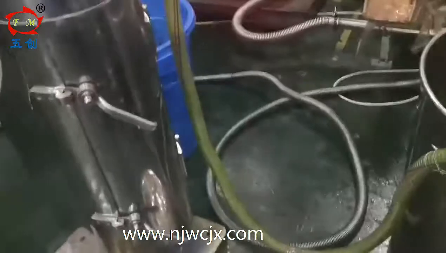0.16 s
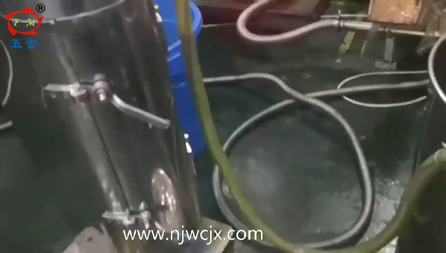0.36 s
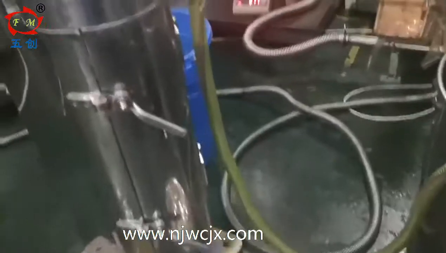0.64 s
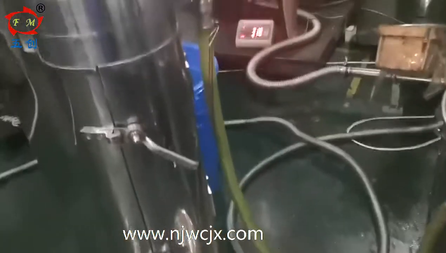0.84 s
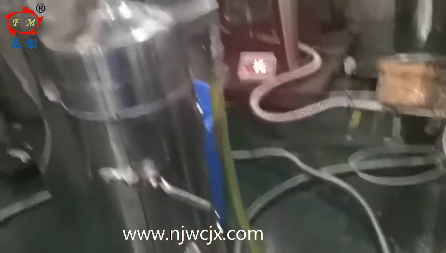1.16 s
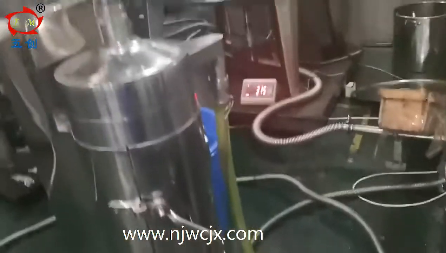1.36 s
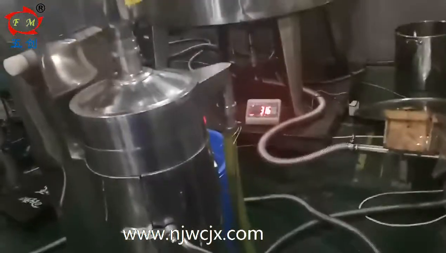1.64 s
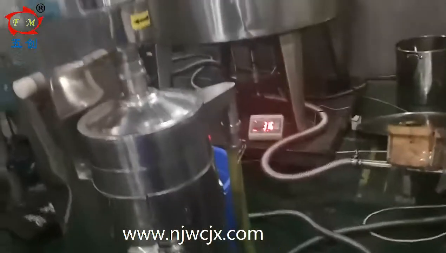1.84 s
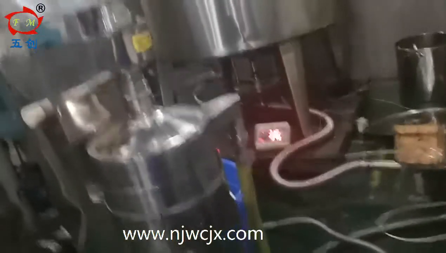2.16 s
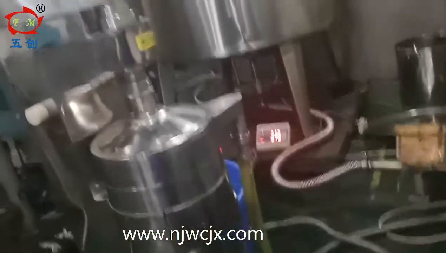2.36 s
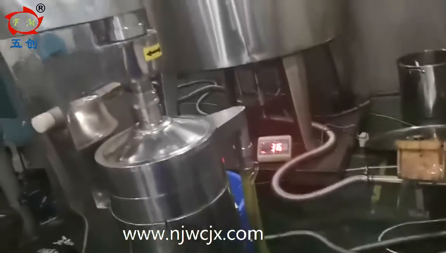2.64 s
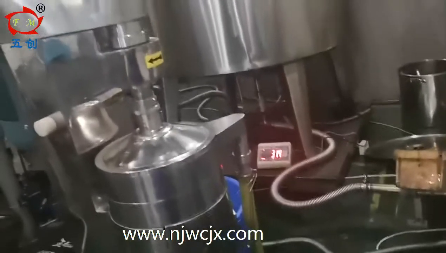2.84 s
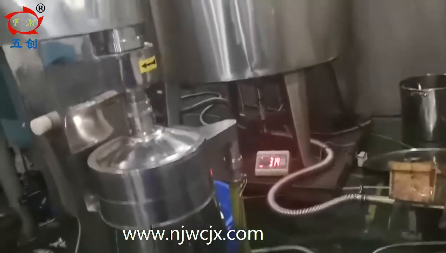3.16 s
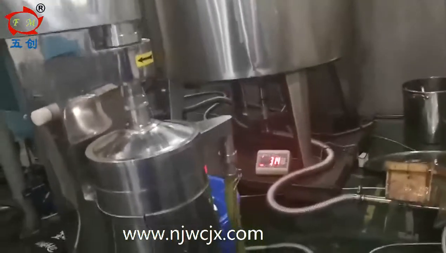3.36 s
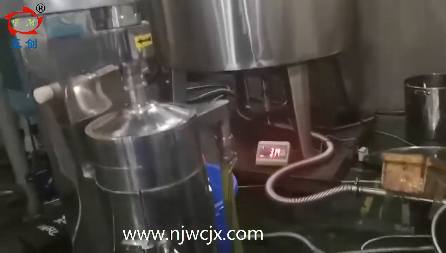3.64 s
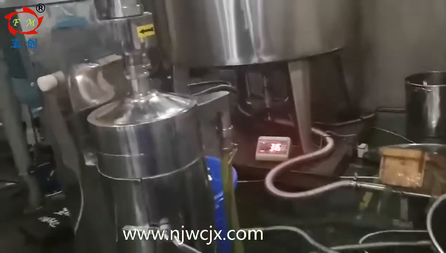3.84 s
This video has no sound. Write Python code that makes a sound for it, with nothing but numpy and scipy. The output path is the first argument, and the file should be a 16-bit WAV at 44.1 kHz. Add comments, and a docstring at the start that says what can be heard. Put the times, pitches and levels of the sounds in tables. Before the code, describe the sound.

Loud steady centrifuge roar with throbbing low hum and metallic bearing rattle, cutting in abruptly.

```python
"""A tubular centrifuge runs at full speed in a workshop, heard from close by; the sound cuts in abruptly.
Spindle and belt hum as steady sines, and the motor's hum beats against the belt as a throb.
The bearings roar and rattle as noise and knocks through a ringing steel housing, and whine with the frame
as wavering sines. Low filtered noise rumbles underneath, and two faint whistles surface late."""
import sys
import numpy as np
from scipy import signal
from scipy.fft import rfft, irfft
from scipy.io import wavfile

SR = 44100
rng = np.random.default_rng(int(sys.argv[2]) if len(sys.argv) > 2 else 0)


def wav_record(signal):
    """Record a signal, one row per channel, as 16-bit PCM in the file named by sys.argv[1]."""
    frames = np.transpose(np.atleast_2d(signal))
    bounded = np.clip(frames, -1, 1)
    # unit amplitude maps onto the largest positive 16-bit level
    quanta = np.round(bounded * 32767).astype(np.int16)
    wavfile.write(sys.argv[1], SR, quanta)


N = 176400  # 4 s

SPINDLE_HZ, BELT_HZ, MOTOR_HUM_HZ = 264.97, 71.0, 149.1
IN_STEP_S = 2.55  # a moment at which all tones are in step, apart from their drift


def amp(db):
    """Decibels to gain."""
    return 10 ** (np.asarray(db) / 20)


def unit(x):
    """Scales to an rms of 1."""
    return x / np.sqrt(np.mean(x ** 2) + 1e-20)


def seconds():
    """The time of each sample."""
    return np.arange(N) / SR


def bins():
    """The frequency of each bin of a full-length spectrum."""
    return np.fft.rfftfreq(N, 1 / SR)


def wander(rate_hz):
    """Smooth random movement of rms 1, mostly below the given rate."""
    lowpass = 1 / (1 + (bins() / rate_hz) ** 4)
    return unit(irfft(rfft(rng.standard_normal(N)) * lowpass, N))


def colour(x, points):
    """Minimum-phase filter with the given (f/Hz, level/dB) shape; the result has rms 1."""
    hz, db = np.transpose(points)
    all_hz = abs(np.fft.fftfreq(N, 1 / SR))
    shape_db = np.interp(np.log(all_hz + 1), np.log(hz), db)
    # the Hilbert transform of the log gain gives the phase
    response = np.exp(np.conj(signal.hilbert(np.log(amp(shape_db)))))
    return unit(irfft(rfft(x) * response[:N // 2 + 1], N))


def tone(hz, db, waver, drift, rate_hz):
    """A sine that wavers in level (share of level) and drifts in phase (radians)."""
    angle = 2 * np.pi * hz * (seconds() - IN_STEP_S) + drift * wander(rate_hz)
    level = np.sqrt(2) * amp(db) * (1 + waver * wander(rate_hz))
    return level * np.cos(angle)


def drive():
    """Spindle and belt tones with their multiples, and the sum tones where they shake each other."""
    # tones of the drive: [multiple of the spindle rate, multiple of the belt rate]
    orders = [(0, 1), (0, 3), (1, 0), (1, 1), (0, 6), (1, 3), (1, 5), (2, 3), (3, 0), (2, 5), (2, 7),
              (2, 10), (5, 0), (6, 0), (0, 24)]
    # their levels in the same order, ahead of the band curves: [level/dB]
    levels = [-41.5, -46.5, -36, -37.5, -47.5, -50, -53.5, -49, -37.5, -47.5, -62, -46, -45.5, -48, -42]
    hum = 0
    for (spindle, belt), db in zip(orders, levels):
        hz = spindle * SPINDLE_HZ + belt * BELT_HZ
        hum = hum + tone(hz, db, waver=0.085, drift=0.29, rate_hz=3.6)
    return hum


def throb():
    """The motor's hum beats seven times a second against the belt's second harmonic."""
    # level curve of the throb: [t/s, level/dB]
    throb_level = [(.36, 2.5), (.72, 2.5), (.9, -0.8), (1.9, 1.2), (2.6, 1.5), (4, -0.3)]
    settings = dict(waver=0.068, drift=0.11, rate_hz=2.7)
    belt = tone(2 * BELT_HZ, -33, **settings)
    motor = tone(MOTOR_HUM_HZ, -34.5, **settings)
    return amp(np.interp(seconds(), *np.transpose(throb_level))) * (belt + motor)


def housing(x):
    """Dense steel modes, made as decaying noise, ring on after the direct sound."""
    # sound of the bearings through the housing: [f/Hz, level per Hz/dB]
    roar = [(300, -30), (600, -19.5), (740, -12.5), (900, -6.5), (1150, -5.5), (1330, -2.5), (1500, -6),
            (1690, -0.5), (1950, -1), (2150, -5.5), (2300, -7), (2600, -7), (2900, -10), (3130, -13),
            (3550, -11.5), (3800, -15), (4250, -20), (4650, -18), (5250, -15), (5650, -13.5), (6050, -20.5),
            (7000, -21), (7850, -25), (8250, -35.5), (8650, -35), (9050, -31.5), (10000, -38.5),
            (11200, -42.5), (12700, -54.5), (15000, -64)]
    t60_s, ring_share = 0.26, 0.068  # decay by 60 dB, share of the power
    ring = rng.standard_normal(N) * amp(-60 * seconds() / t60_s)
    rung = irfft(rfft(x) * rfft(ring / np.linalg.norm(ring)), N)
    return colour(np.sqrt(1 - ring_share) * x + np.sqrt(ring_share) * rung, roar)


def bearings():
    """Rough rolling noise and a rattle of small knocks drive the housing."""
    roll_db, rattle_db = -22.5, -27
    knocks_per_s, knock_spread_db = 1000, 2.8
    rolling = unit(rng.standard_normal(N) * amp(-1 * wander(rate_hz=300)))  # 1 dB rms of roughness
    size_db = knock_spread_db * np.minimum(rng.exponential(1, N), 3)
    sizes = amp(size_db) * rng.choice([-1, 1], N)
    knocks = unit(sizes * (rng.random(N) < knocks_per_s / SR))
    force = amp(roll_db) * rolling + amp(rattle_db) * knocks
    swell = amp(0.33 * wander(rate_hz=9.3))  # 0.33 dB rms
    return np.std(force) * housing(force) * swell


def whines():
    """Less steady tones of bearings and frame; the higher, the more they drift."""
    # tones of bearings and frame, ahead of the band curves: [f/Hz, level/dB]
    whine_tones = [(58.2, -49), (83.2, -49.5), (116.4, -47), (120.7, -45.5), (216.5, -43), (234, -53),
                   (433.3, -52.5), (510, -58), (550, -53.5), (1080, -44.5), (1714, -45), (1803, -46),
                   (1937, -49), (1986, -53), (2118, -58), (2209, -38.5), (2550, -44.5), (2633, -50),
                   (2950, -51), (3546, -50), (4918, -56), (5598, -53), (5685, -55), (7010, -63),
                   (8910, -72)]
    waver, drift_at_1khz = 0.47, 0.83  # share of level, radians
    return sum(tone(hz, db, waver, drift_at_1khz * hz / 1000, rate_hz=5.1) for hz, db in whine_tones)


def rumble():
    """The frame shakes at random: noise shaped towards the bass."""
    # low rumble of the frame: [f/Hz, level per Hz/dB]
    frame_shape = [(12, -15), (30, -6), (48, -4.5), (65, 2.5), (92, 1), (130, 4), (190, 1.5), (240, 3),
                   (330, 2.5), (385, -2.5), (520, -5.5), (720, -7.5), (1200, -39), (4000, -68.5)]
    return amp(-31) * colour(rng.standard_normal(N), frame_shape)


def whistles():
    """Two thin tones fade in late above the roar; the first fades out again."""
    # faint whistles: [f/Hz, start t/s, end t/s, level/dB ahead of the band curves]
    whistle_tones = [(884, 3.1, 3.68, -39.5), (1078, 3.3, 4.1, -37)]
    t, fade_s = seconds(), .1
    total = 0
    for hz, start, end, db in whistle_tones:
        fade = np.clip(np.minimum(t - start, end - t) / fade_s, 0, 1)
        total = total + fade * tone(hz, db, waver=.2, drift=.5, rate_hz=4)
    return total


def scene():
    """The machine with bass, middle and treble on their own level curves, plus the throb."""
    # loudness at the microphone: [t/s, bass level/dB, middle level/dB, treble level/dB]
    band_levels = [(.36, 4.5, 3, 3), (.41, 5, 4, 4), (.52, 5, 2, 2), (.62, 5, 3, 3.5), (.73, 5, 3, 0),
                   (.83, -0.5, -0.5, -1), (1.05, -0.7, -0.5, -0.1), (1.3, .3, -0.2, -1),
                   (1.8, 0.6, 0.2, -0.5), (2.3, 0.5, -.2, -0.4), (2.7, 1.5, 0.4, 0), (3.1, 1.1, -0.1, 1),
                   (3.45, -0.5, .1, -1), (4, 0.7, 0.2, -0.2)]
    spectrum = rfft(bearings() + rumble() + drive() + whines() + whistles())
    bass = 1 / (1 + (bins() / 650) ** 4)  # band edges in Hz
    treble = 1 - 1 / (1 + (bins() / 3150) ** 4)
    middle = 1 - bass - treble
    times, *curves = np.transpose(band_levels)
    machine = 0
    for band, db in zip([bass, middle, treble], curves):
        machine = machine + irfft(spectrum * band, N) * amp(np.interp(seconds(), times, db))
    return (machine + throb())[None]


def record(dry):
    """The sound cuts in from silence; then a steep low-pass limits the band."""
    start_s, rise_s, cutoff_hz = .357, .002, 15100
    opened = dry * np.clip((seconds() - start_s) / rise_s, 0, 1)
    lowpass = signal.firwin(511, cutoff_hz, window=("kaiser", 9), fs=SR)
    return signal.oaconvolve(opened, lowpass[None], "same")


dry = scene()
out = record(dry)
wav_record(out)
```